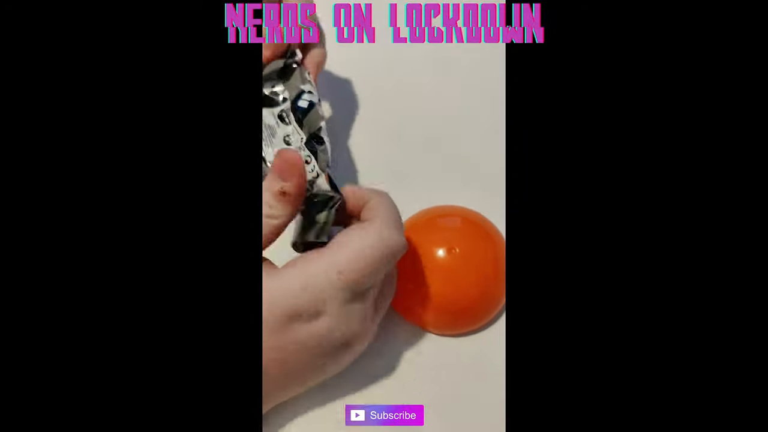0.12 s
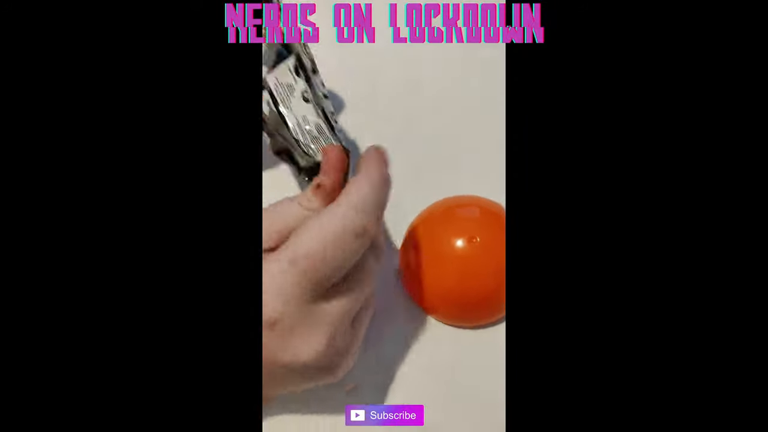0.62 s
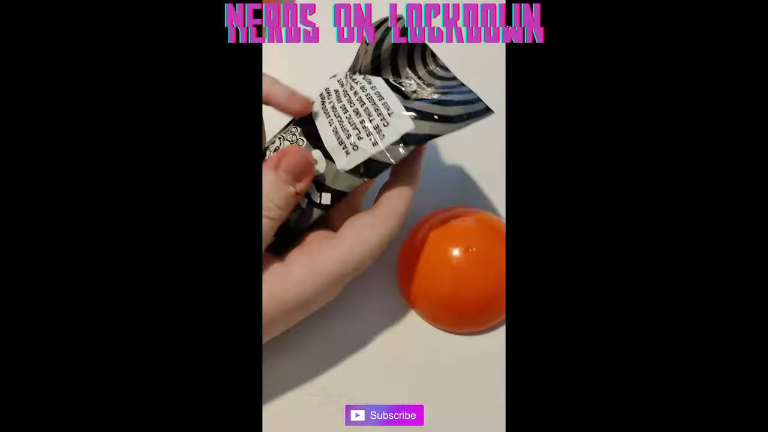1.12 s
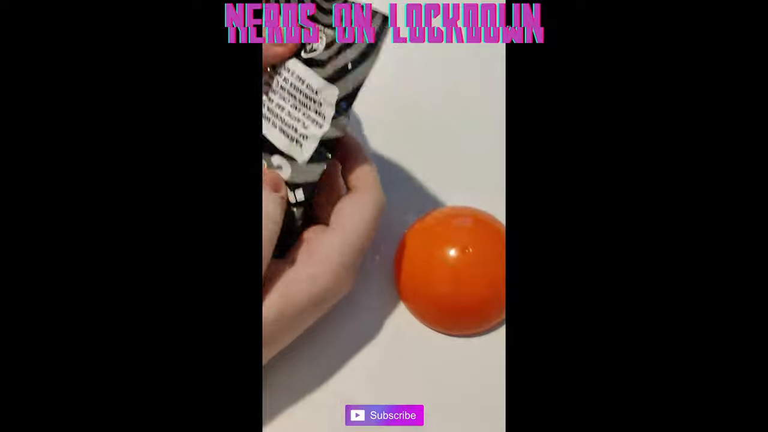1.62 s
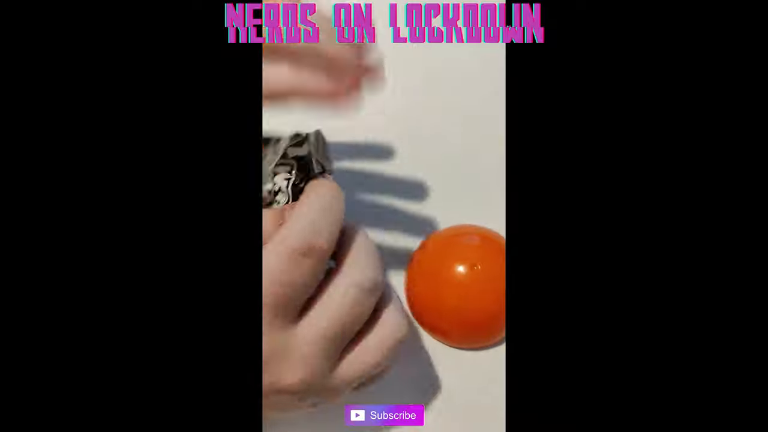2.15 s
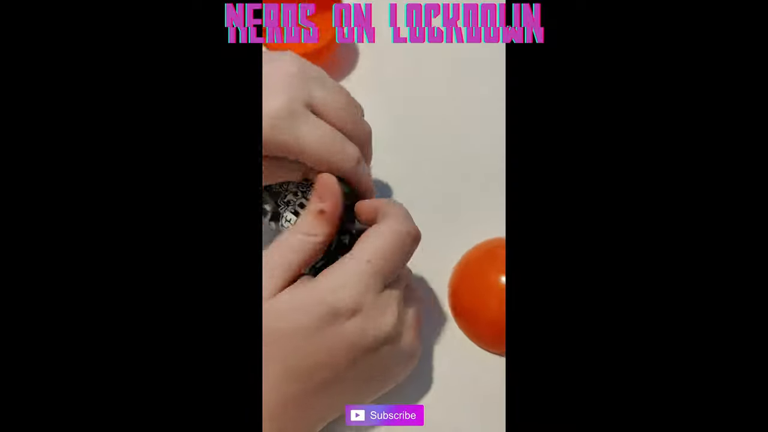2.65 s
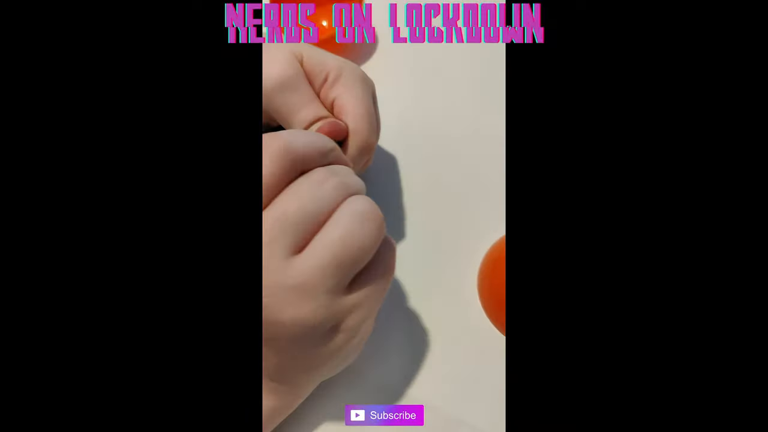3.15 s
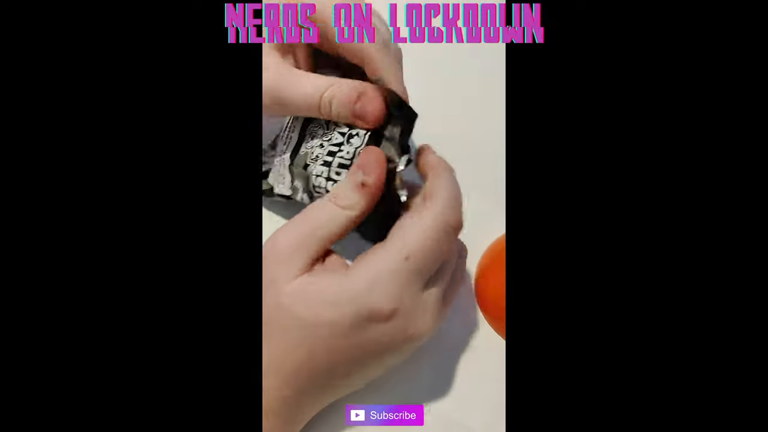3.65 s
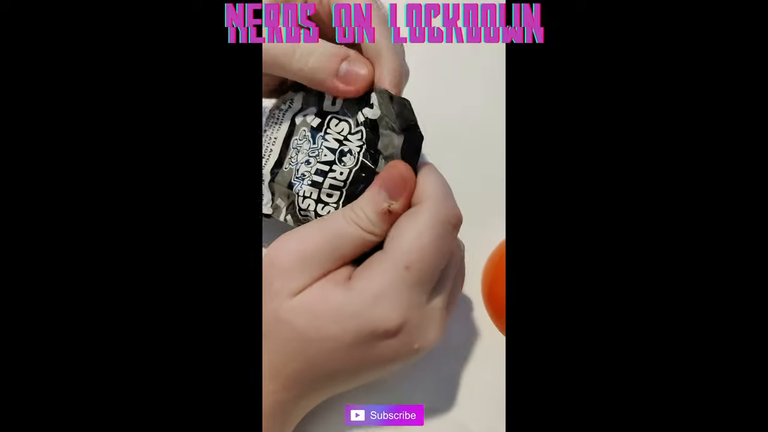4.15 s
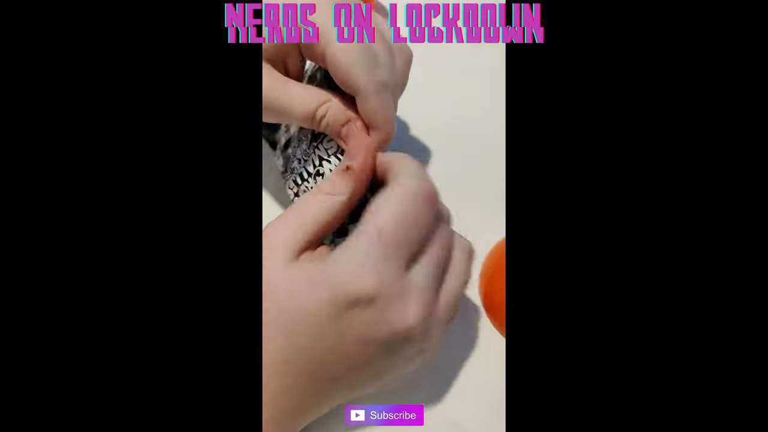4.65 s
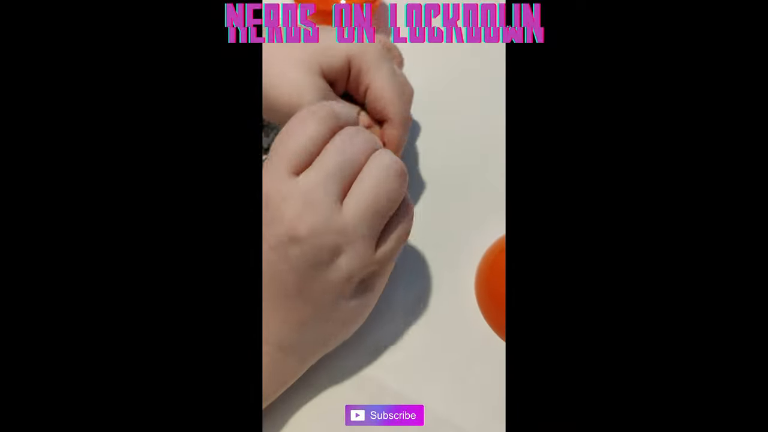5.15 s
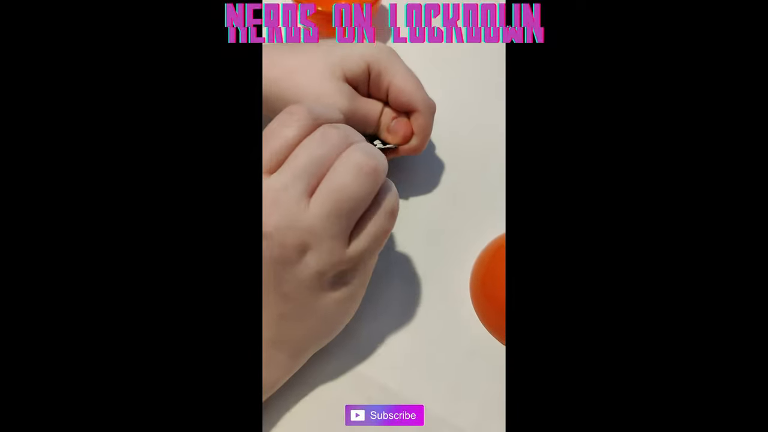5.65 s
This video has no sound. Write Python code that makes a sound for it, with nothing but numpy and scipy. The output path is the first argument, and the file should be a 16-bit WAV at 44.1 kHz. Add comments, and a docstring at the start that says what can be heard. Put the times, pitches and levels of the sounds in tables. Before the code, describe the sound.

Hands work a small foil packet very close to a phone microphone in a quiet room. Dense bright crackles come first, with a loud burst near half a second and another around one second, then sparser rustling, a swelling crinkle near three seconds, thin seam ticks, a near lull after four seconds, and renewed snapping at the end. Faint hum and low air puffs lie underneath.

```python
"""Fingers crinkle and pull at a small foil packet close to a phone microphone, in a quiet room.
Each crease that buckles gives a bright crack (a short noise burst) and a pop (the panel beside it rings).
Thousands of small creases rustle; a seam ticks, fingers squeak and rub, foil slides and the packet thumps.
A wavering hum and filtered-noise room air lie underneath, and puffs of air buffet the microphone."""
import sys
import numpy as np
from scipy import signal
from scipy.fft import rfft, irfft, next_fast_len
from scipy.io import wavfile
from scipy.ndimage import uniform_filter1d, map_coordinates

SR = 44100
rng = np.random.default_rng(int(sys.argv[2]) if len(sys.argv) > 2 else 0)


def to_wav(s):
    """Save 16-bit WAV."""
    ch = np.atleast_2d(s).T  # columns
    pcm = np.round(np.clip(ch, -1, 1) * 32767)  # PCM
    wavfile.write(sys.argv[1], SR, pcm.astype(np.int16))


def volts_from_db(level):
    """Convert decibel levels to linear amplitude ratios."""
    exponent = np.asarray(level, float) / 20
    return 10 ** exponent


N = 255055  # length [samples]

# colour of a crack: (frequency [Hz], gain [dB])
CRACK_COLOUR = [(300, -2), (1200, 1), (4000, 10.5), (7000, 12.5), (20000, 12)]
# colour of small panels, too small to radiate bass: (frequency [Hz], gain [dB])
PANEL_COLOUR = [(200, -58), (600, -1.5), (1200, -1.5), (4000, -5.5), (7000, -2), (14000, -24)]


def unit(x):
    """Bring a sound to an rms level of 1."""
    return x / np.sqrt(np.mean(x ** 2) + 1e-20)


def along(points, hz):
    """Read a curve of (frequency [Hz], value) points, joined by straight lines on a log axis."""
    f, v = np.transpose(points)
    return np.interp(np.log(hz + 1), np.log(f + 1), v)


def wobble(rate):
    """A smooth random curve through `rate` random points a second."""
    knots = rng.standard_normal(int(N * rate / SR) + 4)
    return map_coordinates(knots, [np.arange(N) * rate / SR])


def coloured(x, spectrum):
    """Filter x to these gains, with the response only after each input: nothing sounds before a click."""
    m = 2 * next_fast_len(N // 2 + SR // 4)
    gain_db = along(spectrum, np.fft.rfftfreq(m, 1 / SR))
    # folding the cepstrum (the spectrum of the log gains) forward in time makes the filter causal
    cepstrum = irfft(np.log(volts_from_db(gain_db)), m)
    cepstrum[1:m // 2] *= 2
    cepstrum[m // 2 + 1:] = 0
    response = np.exp(rfft(cepstrum))
    return irfft(rfft(x, m) * response, m)[..., :N]


def scatter(times, shapes):
    """Add up many short sounds, one per row of shapes, each from its own time [s]."""
    starts = np.round(times * SR).astype(int)[:, None]
    at = starts + np.arange(shapes.shape[1])
    return np.bincount(at.clip(0).ravel(), shapes.ravel(), N + shapes.shape[1])[:N]


def swells(s, db, gather, fade):
    """Power of each swell at every sample: up to its peak and down again, in straight lines in dB."""
    late = np.arange(N) / SR - s[:, None]
    distance = np.where(late < 0, -late / gather[:, None], late / fade[:, None])
    return volts_from_db(2 * (db[:, None] - 20 * distance))  # twice the dB turns amplitude into power


def cracks(db, t60, spread, size):
    """A crease lets go in a burst of tiny slips: noise that gathers in a few samples and dies in milliseconds."""
    t = np.arange(size) / SR
    life = t60 * np.exp(spread * rng.standard_normal((len(db), 1)))  # time to fall 60 dB [s]
    envelope = (1 - np.exp(-t / 0.00014)) * volts_from_db(-60 * t / life)
    burst = rng.standard_normal((len(db), size)) * envelope
    return volts_from_db(db)[:, None] * burst / np.linalg.norm(burst, axis=1, keepdims=True)


def pops(db, hz, cycles, rough, size):
    """A bent surface jumps and rings for a few uneven cycles, down 60 dB after `cycles` of them."""
    turns = hz[:, None] * np.arange(size) / SR
    drift = rough * np.cumsum(rng.standard_normal((len(db), size)), axis=1)
    shape = (1 - np.exp(-turns / 0.31)) * volts_from_db(-60 * turns / cycles)
    shape /= shape.max(axis=1, keepdims=True)
    sign = rng.choice([-1, 1], (len(db), 1))  # the surface may jump in or out
    return volts_from_db(db)[:, None] * shape * np.sin(2 * np.pi * turns + drift) * sign


def hum():
    """Hum from an appliance near twice the mains frequency, wavering in pitch and level."""
    phase = 2 * np.pi * 120.5 * np.arange(N) / SR + .7 * wobble(12)
    return volts_from_db(-56.5 + 2 * wobble(14)) * np.sin(phase)


def air():
    """The room's steady murmur and low puffs on the microphone, both made of filtered noise."""
    # puffs: (time of strongest push [s], level [dB], time to gather 20 dB [s], time to fade 20 dB [s])
    gusts = [(.37, -58, .15, .06), (.49, -61, .08, .1), (.83, -58, .15, .15), (1.16, -39, .06, .03),
             (1.33, -58, .17, .14), (1.52, -50, .08, .5), (2.62, -57, .17, .26), (3.35, -41, .17, .07),
             (3.48, -44, .08, .3), (3.7, -37, .25, .06), (5.08, -62, .5, .5)]
    # colour of the puffs: (frequency [Hz], gain [dB])
    buffet_colour = [(15, -30), (40, 8), (70, 0), (105, -8), (200, -83), (400, -56)]
    # colour of the murmur: (frequency [Hz], gain [dB])
    murmur_colour = [(40, -15.5), (150, 1.5), (400, -1.5), (900, -14.5), (2000, -24), (6000, -56),
                     (16000, -40)]
    still_air_db = -73  # push that remains between puffs

    push = np.sqrt(swells(*np.transpose(gusts)).sum(axis=0) + volts_from_db(2 * still_air_db))
    buffet = coloured(rng.standard_normal(N), buffet_colour)
    # turbulence keeps pushing while a puff lasts: even out the slow swells of the noise
    buffet /= np.sqrt(np.abs(uniform_filter1d(buffet ** 2, size=SR // 10)) + 1e-9)
    murmur = volts_from_db(-64.5) * unit(coloured(rng.standard_normal(N), murmur_colour))
    return push * buffet + murmur


def room(x, count=24):
    """Walls answer with a tail that differs as the hands move; each frequency dies at its own speed."""
    # echo decay: (frequency [Hz], time to fall 60 dB [s])
    decay_times = [(500, 0.21), (3000, .14), (7000, 0.17), (15000, 0.16)]
    out = np.zeros(2 * N)
    for part in np.array_split(np.arange(N), count):
        hz, t, z = signal.stft(rng.standard_normal(SR // 2), SR, nperseg=128)
        swell = 1 - np.exp(-t / 0.002)  # reflections take a moment to gather
        fall = volts_from_db(-60 * t / along(decay_times, hz)[:, None])
        tail = signal.istft(z * swell * fall, SR, nperseg=128)[1]
        wet = signal.fftconvolve(x[part], tail / np.linalg.norm(tail))
        out[part[0]:part[0] + len(wet)] += wet
    return out[:N]


def rubs():
    """A hand rubs over the packet and the table; skin drags unevenly, as a soft, low scrape of noise."""
    # rubs: (time of firmest contact [s], level [dB], time to gather 20 dB [s], time to fade 20 dB [s])
    strokes = [(.3, -59, .6, .5), (.5, -55, .15, .15), (.82, -58, .1, .1), (1.04, -57, .3, .4),
               (2.1, -60, .5, .5), (3.67, -55, .1, .2), (4.86, -54, .04, .25), (5.08, -57, .3, .2),
               (5.5, -62, .3, .3)]
    # colour of skin dragging: (frequency [Hz], gain [dB])
    skin_colour = [(100, -30), (190, 0), (600, -3), (1200, -10), (3000, -30), (8000, -60)]
    pressure = np.sqrt(swells(*np.transpose(strokes)).sum(axis=0))
    scrape = unit(coloured(rng.standard_normal(N), skin_colour))
    return pressure * volts_from_db(3 * wobble(40)) * scrape


def thumps():
    """The whole packet flexes: a low push of a cycle or two."""
    # flexes: (time [s], level [dB], pitch [Hz])
    flexes = [(0.0665, -34, 650), (0.2696, -34, 546), (0.3235, -32.5, 650), (0.393, -36, 546),
              (0.4551, -32, 626), (0.463, -35, 180), (0.4816, -31, 696), (0.4978, -32, 514),
              (0.5857, -36, 450), (0.7222, -35, 620), (1.7563, -25.5, 480), (2.226, -40, 580),
              (2.461, -34, 676), (2.666, -34.5, 615), (2.9448, -35, 580), (3.7317, -28, 704),
              (3.7667, -33.5, 600)]
    s, db, hz = np.transpose(flexes)
    return scatter(s - .001, pops(db, hz, cycles=3.7, rough=0.15, size=900))


def squeaks():
    """A finger sticks and slips on foil at a nearly steady rate: a brief gliding tone with overtones."""
    # squeaks: (time [s], length [s], level [dB], start pitch [Hz], end pitch [Hz], step per overtone [dB])
    finger_slips = [(2.247, .021, -44, 1313, 1220, -4)]
    out = np.zeros(N)
    for s, length, db, start_hz, end_hz, overtone_db in finger_slips:
        u = np.arange(round(length * SR)) / (length * SR)
        pitch_hz = start_hz + (end_hz - start_hz) * u ** 2
        phase = 2 * np.pi * np.cumsum(pitch_hz) / SR
        phase += .06 * np.cumsum(rng.standard_normal(len(u)))  # slightly rough
        tone = sum(volts_from_db(overtone_db * k) * np.sin((k + 1) * phase) for k in range(3))
        out[round(s * SR):][:len(u)] += volts_from_db(db) * np.sin(np.pi * u) * tone
    return out


def seam():
    """The sealed seam gives way in even jerks, mostly ever weaker: thin ticks with little but treble."""
    # peels: (time [s], number of jerks, gap [s], first jerk before colouring [dB], last jerk likewise [dB])
    peels = [(3.5897, 3, .0029, -31, -33), (3.662, 6, .0016, -34, -40), (3.692, 4, .0016, -31, -29),
             (3.6984, 10, .00295, -29, -37), (4.0397, 8, .0022, -28, -41)]
    times = np.concatenate([s + gap * np.arange(jerks) for s, jerks, gap, _, _ in peels])
    db = np.concatenate([np.linspace(first_db, last_db, jerks) for _, jerks, _, first_db, last_db in peels])
    ticks = scatter(times - .0002, cracks(db, t60=.0012, spread=.1, size=99))
    return np.diff(coloured(ticks, CRACK_COLOUR), prepend=0)  # so small a source radiates its motion's slope


def slides():
    """Foil slides or rips so fast that its slips merge: a bright, grainy rush with the panels rattling along."""
    # slides: (time of peak [s], level of the bright part [dB], time to gather 20 dB [s], time to fade 20 dB [s])
    rushes = [(.472, -32, .045, .09), (2.27, -48, .06, .1), (3.097, -38, .02, .04)]
    pressure = np.sqrt(swells(*np.transpose(rushes)).sum(axis=0)) * volts_from_db(3 * wobble(400))
    bright, dull = rng.standard_normal((2, N))
    rush = unit(coloured(bright, CRACK_COLOUR))
    rattle = volts_from_db(-3) * unit(coloured(dull, PANEL_COLOUR))
    return pressure * (rush + rattle)


def grip():
    """Rustle level and dullness at each sample: squeezes add their power, the strongest weighs most in colour."""
    # squeezes of the fingers: (time of full grip [s], relative rustle level [dB], time to gather 20 dB [s],
    # time to fade 20 dB [s], relative level of dull part over bright part [dB])
    squeezes = [(.048, -35, .05, .11, 3), (.17, -45, .07, .2, -3), (.284, -34, .13, .13, -2),
                (.425, -35, .13, .1, 5), (.47, -22, .035, .07, -3), (.56, -45, .05, .08, 6),
                (.72, -42, .15, .1, 5), (.81, -37, .15, .06, 4), (.9, -54, .1, .16, 8),
                (.982, -29, .02, .12, -8), (1.04, -34, .05, .06, 0), (1.139, -30, .09, .055, -3),
                (1.31, -35, .08, .065, 0), (1.44, -49, .04, .2, 5), (1.503, -45, .07, .07, 6),
                (1.765, -41, .045, .13, 2), (1.969, -44, .1, .05, 9), (2.09, -40, .05, .08, 6),
                (2.29, -42, .1, .1, 2), (2.436, -36, .08, .15, 3), (2.621, -35, .11, .2, 1),
                (2.775, -40, .07, .09, 5), (2.94, -38, .14, .22, 7), (3.04, -36, .2, .1, 2),
                (3.1, -26, .04, .075, -2), (3.246, -38, .1, .07, 2), (3.35, -42, .04, .15, -2),
                (3.46, -40, .02, .1, -2), (3.506, -33, .06, .14, -8), (3.6, -44, .1, .1, 8),
                (3.662, -34, .015, .08, 2), (3.692, -35, .05, .09, 0), (3.787, -34, .06, .07, -1),
                (3.967, -52, .15, .07, -3), (4.04, -46, .055, .075, 2), (4.124, -54, .1, .15, 10),
                (4.295, -62, .03, .05, 3), (4.44, -64, .04, .2, 4), (4.58, -56, .15, .2, 8),
                (4.66, -52, .1, .1, 9), (4.7, -30, .012, .13, -5), (4.842, -47, .03, .3, 11),
                (5.06, -45, .12, .3, 4), (5.178, -30, .07, .055, -6), (5.377, -50, .07, .18, 1),
                (5.474, -48, .04, .06, 0), (5.556, -47, .12, .07, 4), (5.669, -42, .06, .2, 0),
                (5.75, -40, .1, .2, -6)]
    # fingers merely holding on: (relative rustle level [dB], relative level of dull over bright part [dB])
    hold = (-82, 16)
    s, db, gather, fade, dull_db = np.transpose(squeezes)
    power = swells(s, db, gather, fade)
    rest = volts_from_db(2 * hold[0])
    total = power.sum(axis=0) + rest
    return 10 * np.log10(total), (dull_db @ power + hold[1] * rest) / total


def rustle(count=3500):
    """Small creases fire in clumps, a few much louder than most, over the hiss of skin on foil."""
    level_db, dull_db = grip()
    u = rng.random((count, 3))
    s = u[:, 0] * (N - 1) / SR
    at = (s * SR).astype(int)
    # the wobble makes clumps, the logarithm makes a few creases stand out
    size_db = level_db[at] + 3.5 * wobble(40)[at] - 5.2 * np.log(u[:, 1] + 0.035)
    hz = 1400 * volts_from_db(10.2 * u[:, 2])
    ticks = scatter(s, cracks(size_db - 8.5, t60=.004, spread=.5, size=300))
    dull = scatter(s, pops(size_db + dull_db[at] - 9, hz, cycles=6, rough=.22, size=300))

    hiss = volts_from_db(level_db + 3.5 * wobble(120))
    bright = ticks + volts_from_db(-31) * hiss * rng.standard_normal(N)
    dull_hiss = hiss * volts_from_db(dull_db - 14) * unit(coloured(rng.standard_normal(N), PANEL_COLOUR))
    return coloured(bright, CRACK_COLOUR) + coloured(dull, PANEL_COLOUR) + dull_hiss


def snaps(count=3):
    """The loud creases: crack and pop together, with a weaker slip before and two after as the fold runs on."""
    # creases that buckle: (time [s], crack before colouring [dB], pop before colouring [dB], panel pitch [Hz])
    creases = [(0.0017, -21, -27, 1490), (0.0086, -26, -22, 1810), (0.0175, -11, -22, 4260),
               (0.0342, -11, -23, 4330), (0.0432, -14, -23, 1870), (0.0651, -29, -28, 2260),
               (0.0777, -26, -50, 1560), (0.0944, -26, -40, 4590), (0.0995, -31, -34, 4590),
               (0.1075, -24, -49, 3350), (0.1524, -17, -47, 2110), (0.1554, -21, -34, 1920),
               (0.1874, -30, -37, 2950), (0.2105, -28, -33, 4480), (0.22, -28, -51, 4440),
               (0.2382, -26, -29, 2410), (0.2513, -30, -40, 3060), (0.2665, -26, -61, 900),
               (0.2812, -25, -31, 3490), (0.3016, -30, -32, 3010), (0.3221, -22, -40, 900),
               (0.3574, -27, -29, 2970), (0.369, -30, -24, 2610), (0.3844, -18, -27, 1270),
               (0.4269, -25, -24, 1360), (0.4491, -13, -42, 2370), (0.4598, -15, -20, 2740),
               (0.4678, -7, -19, 1390), (0.472, -13, -31, 2190), (0.4932, -16, -19, 3730),
               (0.5057, -19, -25, 3040), (0.5149, -17, -21, 4460), (0.5553, -29, -22, 4000),
               (0.5669, -29, -34, 1740), (0.5777, -34, -27, 3180), (0.5833, -26, -27, 2860),
               (0.5942, -34, -39, 1210), (0.6144, -34, -32, 1140), (0.6254, -29, -67, 1400),
               (0.649, -53, -32, 3090), (0.6645, -23, -19, 4590), (0.692, -27, -35, 1310),
               (0.7218, -18, -20, 4390), (0.739, -25, -34, 3400), (0.7414, -25, -19, 3420),
               (0.757, -25, -31, 2480), (0.7685, -30, -37, 2630), (0.7719, -19, -41, 4030),
               (0.8117, -24, -24, 4240), (0.8302, -31, -33, 2800), (0.8905, -30, -37, 3450),
               (0.9719, -23, -18, 3790), (0.981, -21, -26, 4090), (0.9866, -23, -22, 3660),
               (1.006, -28, -12, 3640), (1.0135, -14, -16, 3750), (1.0292, -8, -21, 3290),
               (1.0368, -14, -14, 3750), (1.0469, -16, -30, 3450), (1.0692, -26, -49, 2470),
               (1.0844, -25, -21, 1960), (1.0892, -25, -23, 3250), (1.1095, -27, -25, 2630),
               (1.1254, -29, -14, 2730), (1.1369, -38, -27, 2200), (1.1569, -25, -20, 2630),
               (1.1892, -33, -21, 3380), (1.2709, -27, -24, 3380), (1.2964, -22, -15, 4570),
               (1.3101, -11, -21, 2670), (1.3898, -40, -31, 3320), (1.4301, -22, -11, 4220),
               (1.4354, -25, -28, 2580), (1.4901, -22, -16, 2760), (1.4954, -18, -27, 4350),
               (1.52, -38, -22, 3940), (1.5265, -21, -19, 3420), (1.6137, -41, -36, 4480),
               (1.6334, -41, -41, 4370), (1.645, -62, -40, 930), (1.6648, -62, -39, 2610),
               (1.7269, -38, -42, 1250), (1.7406, -30, -36, 1940), (1.7565, -14, -22, 2000),
               (1.7587, -20, -17, 4500), (1.7763, -31, -34, 3920), (1.7881, -26, -45, 990),
               (1.7948, -30, -32, 2910), (1.8041, -32, -34, 4460), (1.8091, -25, -32, 4030),
               (1.8171, -24, -32, 2910), (1.9115, -37, -24, 1720), (1.9369, -27, -32, 1270),
               (1.9426, -11, -39, 2930), (1.9644, -26, -27, 1160), (1.9683, -24, -25, 3810),
               (2.0062, -32, -59, 1740), (2.0386, -40, -31, 4350), (2.0796, -29, -30, 1790),
               (2.1181, -32, -32, 2870), (2.1779, -33, -55, 3880), (2.2262, -26, -37, 900),
               (2.2999, -26, -31, 4180), (2.3472, -38, -35, 1690), (2.3732, -27, -34, 4110),
               (2.4089, -22, -47, 4570), (2.4139, -19, -23, 3450), (2.4266, -17, -14, 3450),
               (2.4482, -33, -22, 2390), (2.46, -29, -35, 970), (2.4723, -25, -37, 950),
               (2.5447, -29, -34, 2840), (2.567, -30, -23, 2500), (2.6088, -22, -29, 2330),
               (2.6305, -23, -49, 2220), (2.6521, -24, -29, 950), (2.6649, -31, -44, 900),
               (2.6825, -22, -49, 2610), (2.6854, -28, -30, 2260), (2.7046, -23, -26, 2820),
               (2.7127, -31, -29, 2350), (2.7608, -33, -33, 900), (2.7685, -24, -40, 1010),
               (2.7752, -21, -24, 2860), (2.7848, -27, -27, 3100), (2.8497, -30, -32, 2090),
               (2.8529, -25, -27, 2950), (2.863, -31, -23, 2890), (2.89, -32, -26, 2410),
               (2.9159, -24, -50, 3040), (2.9286, -17, -50, 3210), (2.9386, -25, -19, 3510),
               (2.9442, -14, -11, 3920), (2.9726, -12, -16, 1740), (2.9813, -27, -26, 900),
               (2.9913, -23, -20, 3830), (3.0011, -20, -24, 1640), (3.0079, -28, -31, 4540),
               (3.0197, -21, -28, 1120), (3.0327, -29, -25, 1290), (3.0369, -26, -28, 2110),
               (3.0408, -18, -28, 1310), (3.044, -24, -32, 2640), (3.07, -20, -26, 1530),
               (3.0802, -26, -28, 1460), (3.0904, -20, -27, 1270), (3.0941, -13, -43, 1570),
               (3.1005, -20, -30, 1060), (3.116, -27, -30, 2540), (3.126, -21, -23, 2070),
               (3.145, -24, -33, 1030), (3.1626, -29, -27, 1830), (3.1988, -24, -26, 1830),
               (3.2188, -37, -22, 3270), (3.24, -25, -34, 1230), (3.2703, -33, -34, 3100),
               (3.3179, -58, -32, 3170), (3.3346, -20, -30, 4330), (3.3583, -21, -44, 3120),
               (3.3768, -28, -33, 1590), (3.4523, -29, -40, 1550), (3.4558, -23, -27, 4070),
               (3.4608, -32, -33, 3980), (3.4924, -23, -26, 4310), (3.4983, -19, -51, 4480),
               (3.5104, -27, -30, 3880), (3.5617, -32, -31, 1080), (3.5733, -30, -29, 900),
               (3.5787, -30, -20, 4350), (3.5968, -30, -33, 1230), (3.6231, -28, -30, 1010),
               (3.6462, -33, -29, 1850), (3.6545, -19, -50, 4440), (3.6575, -20, -29, 4540),
               (3.6624, -33, -19, 4500), (3.6715, -22, -49, 2150), (3.6834, -19, -31, 3960),
               (3.689, -19, -34, 1400), (3.7327, -24, -29, 2500), (3.7427, -31, -24, 2990),
               (3.7653, -32, -23, 2910), (3.7834, -22, -26, 4460), (3.7881, -27, -32, 3700),
               (3.7911, -27, -54, 2330), (3.7957, -27, -30, 2410), (3.8184, -42, -31, 2120),
               (3.8508, -40, -30, 3770), (3.8854, -29, -23, 2410), (3.9074, -35, -50, 2390),
               (3.924, -40, -37, 900), (3.9328, -54, -34, 2450), (3.9473, -34, -40, 4370),
               (3.9589, -16, -44, 990), (3.9791, -36, -39, 1490), (4.0177, -30, -33, 1460),
               (4.0272, -31, -28, 3900), (4.0378, -18, -44, 4460), (4.0979, -46, -41, 2780),
               (4.1155, -13, -28, 4370), (4.1271, -39, -23, 1460), (4.151, -32, -26, 2890),
               (4.1752, -53, -37, 1360), (4.1981, -40, -31, 1380), (4.2694, -69, -39, 1120),
               (4.2874, -25, -47, 4410), (4.2925, -37, -45, 4390), (4.3939, -36, -49, 1460),
               (4.4265, -24, -38, 2480), (4.4982, -43, -39, 3040), (4.5216, -21, -35, 2390),
               (4.5429, -23, -36, 2390), (4.5612, -40, -40, 1330), (4.5701, -25, -31, 2390),
               (4.5862, -24, -53, 2410), (4.5903, -26, -63, 1230), (4.5997, -22, -44, 3900),
               (4.6187, -16, -40, 3810), (4.6457, -30, -44, 4460), (4.6574, -30, -40, 4480),
               (4.6851, -23, -35, 2390), (4.7498, -31, -29, 1570), (4.7626, -24, -33, 1400),
               (4.7844, -26, -24, 3680), (4.8017, -27, -42, 2970), (4.8674, -33, -23, 4070),
               (4.9095, -32, -29, 2430), (4.9539, -32, -16, 3420), (4.9652, -29, -19, 3420),
               (4.9737, -43, -25, 3450), (4.9937, -15, -20, 4590), (5.0025, -32, -59, 4590),
               (5.0405, -35, -17, 3270), (5.0461, -37, -24, 1510), (5.0544, -39, -26, 2520),
               (5.0706, -33, -13, 2430), (5.0903, -29, -24, 1890), (5.1033, -23, -14, 3400),
               (5.1255, -45, -29, 1860), (5.1495, -21, -26, 4590), (5.1703, -19, -11, 4590),
               (5.1854, -16, -14, 3420), (5.2, -24, -32, 2600), (5.317, -56, -41, 2630),
               (5.3493, -51, -37, 3600), (5.3724, -37, -28, 2090), (5.3836, -48, -25, 3830),
               (5.4338, -49, -33, 1290), (5.4474, -41, -36, 2520), (5.4663, -21, -25, 4540),
               (5.5147, -33, -25, 1700), (5.5308, -31, -41, 2350), (5.5489, -29, -24, 2500),
               (5.5582, -35, -25, 1700), (5.568, -49, -34, 1480), (5.5765, -50, -36, 1610),
               (5.6335, -38, -35, 1490), (5.6506, -47, -23, 3940), (5.6648, -28, -16, 2820),
               (5.6703, -26, -30, 1610), (5.7167, -40, -38, 2520)]
    s, crack_db, pop_db, hz = np.transpose(creases)
    crack = scatter(s - .0003, cracks(crack_db, t60=.004, spread=.35, size=400))
    pop = scatter(s - .0003, pops(pop_db, hz, cycles=8.5, rough=.2, size=500))

    # the weaker slips: one before, two after, softer the further away
    u = rng.random((len(s), count, 3))
    wait = .003 * (.4 + u[..., 0]) * [-1, 1, 2]  # [s]
    late = (s[:, None] + wait).ravel()
    loss_db = -12 - 900 * np.abs(wait) - 8 * u[..., 1]
    slip_crack_db = (crack_db[:, None] + loss_db).ravel()
    slip_pop_db = (pop_db[:, None] + loss_db).ravel()
    nearby_hz = (hz[:, None] * volts_from_db(6 * u[..., 2] - 2)).ravel()
    crack += scatter(late, cracks(slip_crack_db, t60=.004, spread=.4, size=300))
    pop += scatter(late, pops(slip_pop_db, nearby_hz, cycles=8, rough=.2, size=400))
    return coloured(crack, CRACK_COLOUR) + coloured(pop, PANEL_COLOUR)


def scene():
    """Foil and its echo in the room, over hum and air."""
    foil = snaps() + thumps() + squeaks() + seam() + slides() + rubs() + rustle()
    echo = volts_from_db(-16) * room(foil)
    return (foil + echo + hum() + air())[None]


def band_limit(x):
    """A steep low-pass at the top of the band."""
    return signal.sosfilt(signal.butter(12, 17150, fs=SR, output="sos"), x)


def record(dry):
    """The microphone port dips near 5.7 kHz and rings near 7 kHz."""
    # colour of the microphone: (frequency [Hz], gain [dB])
    port_colour = [(20, -0.5), (4500, 2.5), (5670, -5.5), (6500, 4), (7200, 9.5), (8800, 2.5), (14000, -1),
                   (15900, -7.5), (17000, -50), (18000, -82)]
    mix = coloured(dry, port_colour)
    return band_limit(mix)


dry = scene()
out = record(dry)
to_wav(out)
```